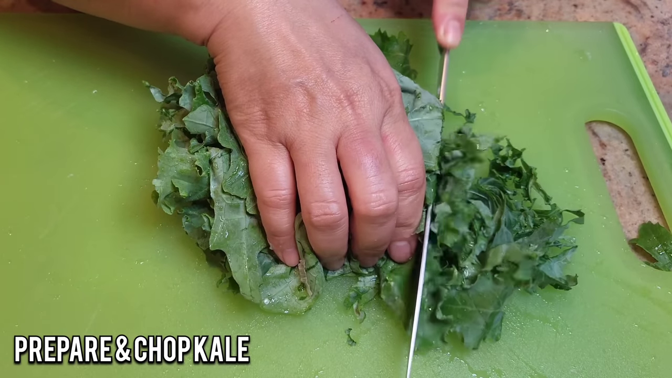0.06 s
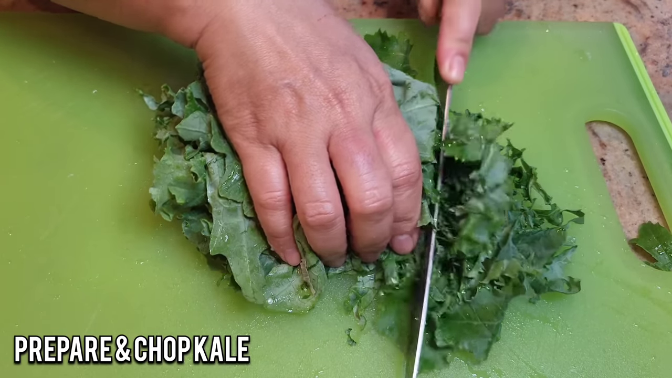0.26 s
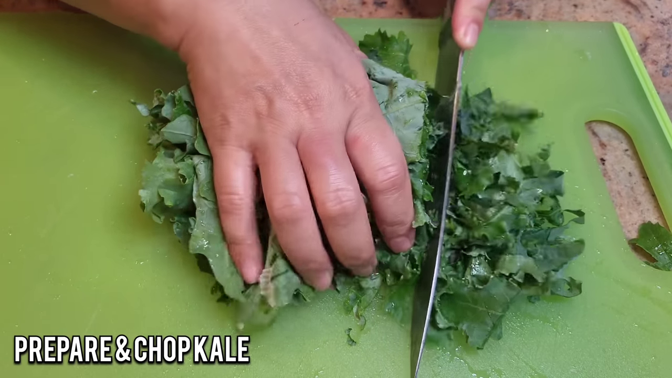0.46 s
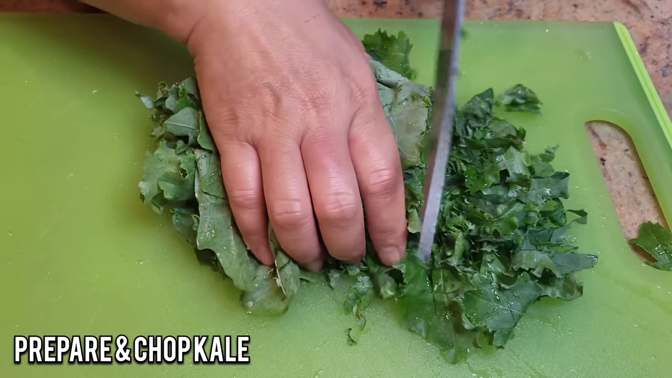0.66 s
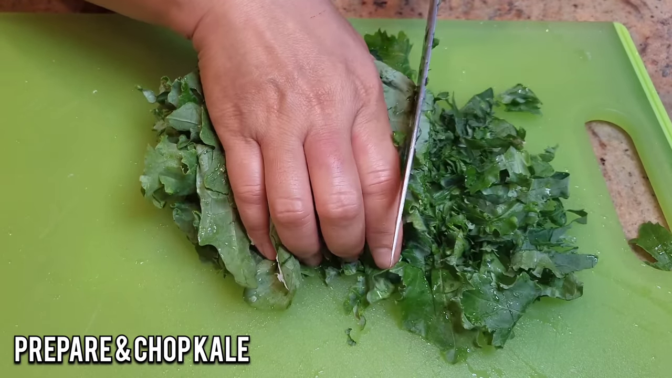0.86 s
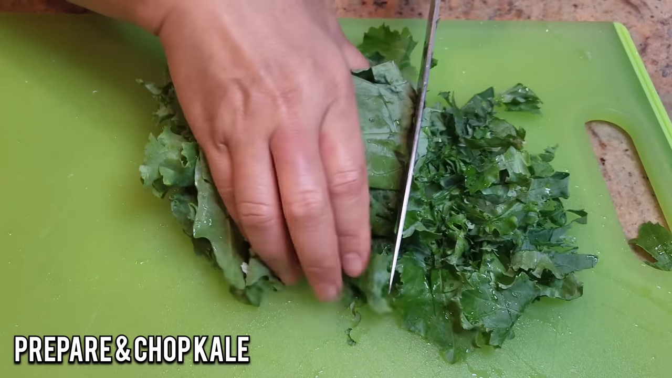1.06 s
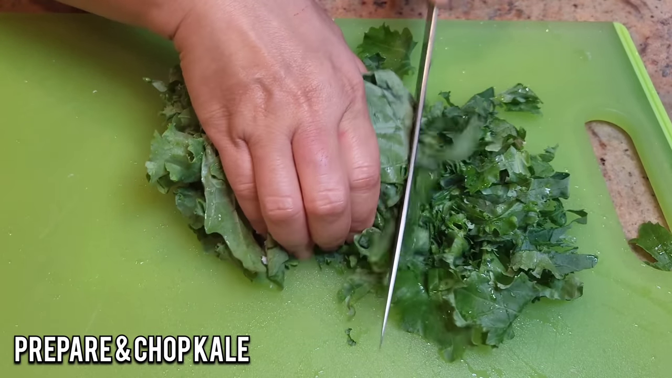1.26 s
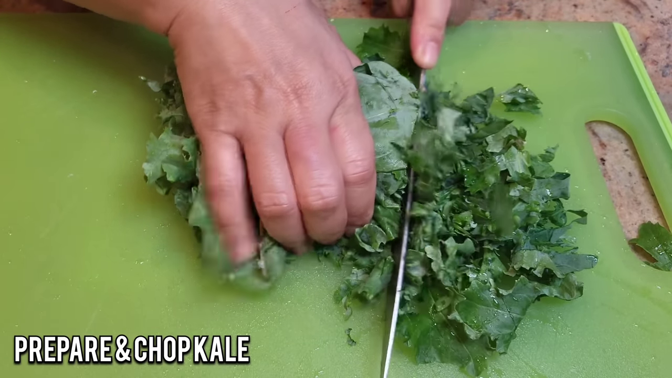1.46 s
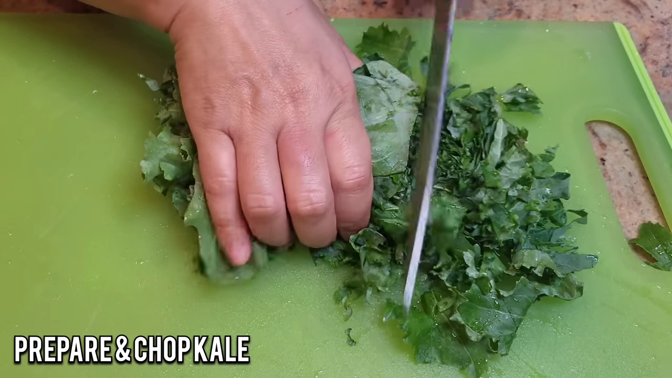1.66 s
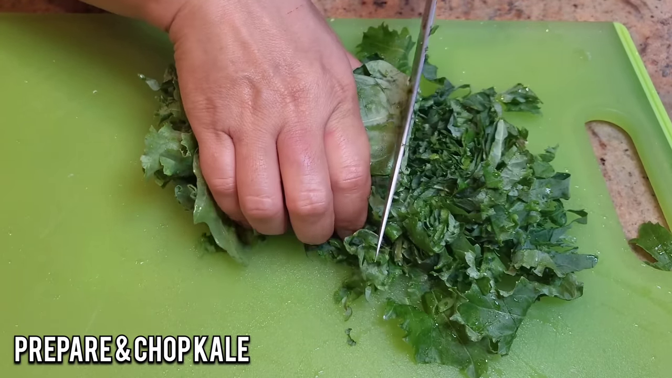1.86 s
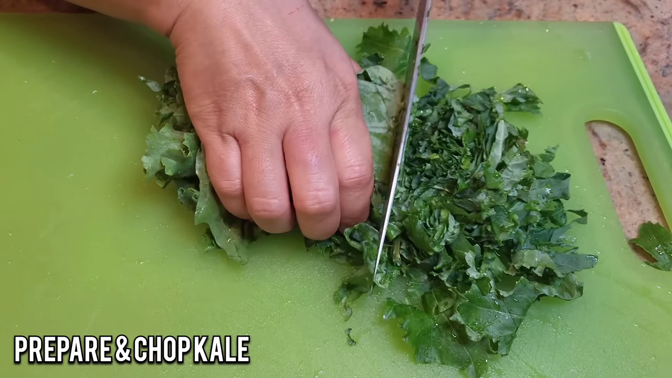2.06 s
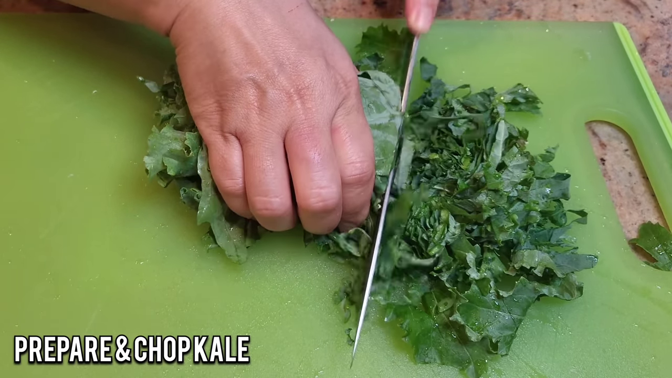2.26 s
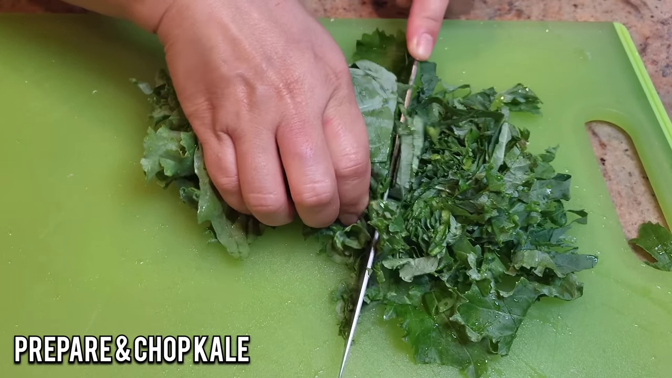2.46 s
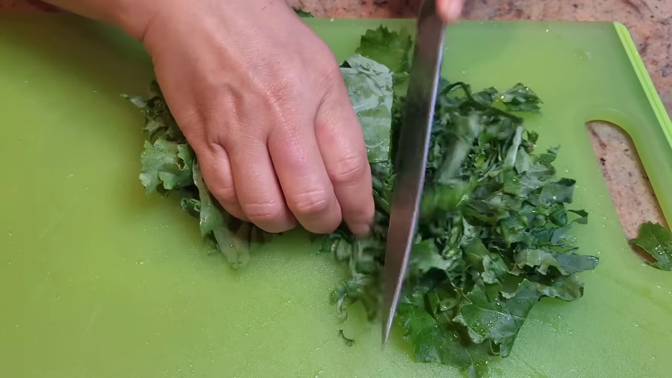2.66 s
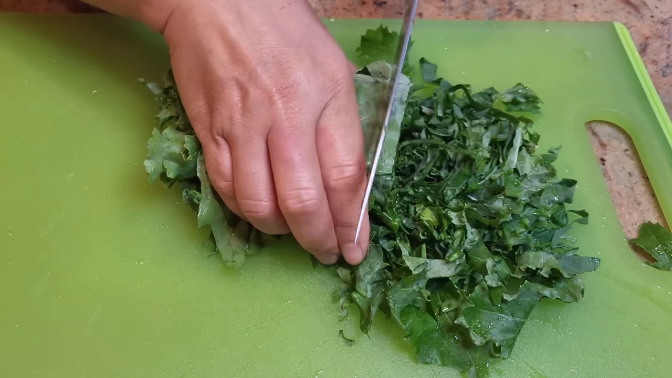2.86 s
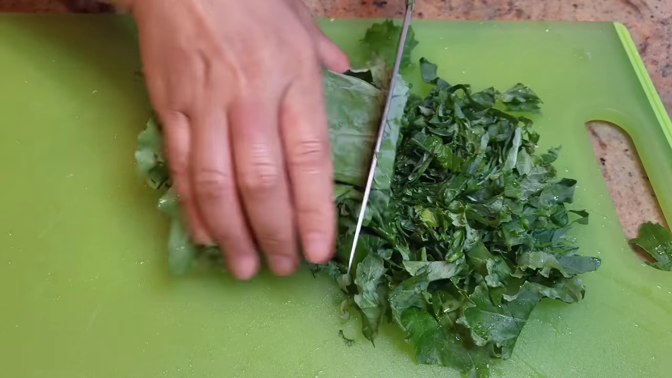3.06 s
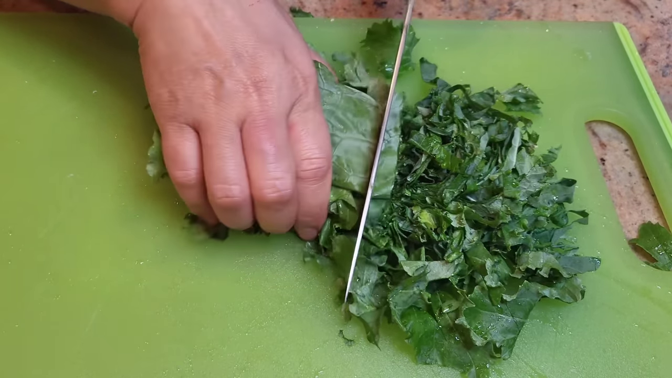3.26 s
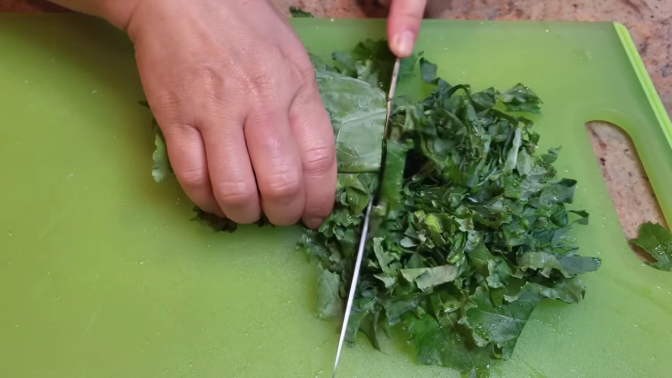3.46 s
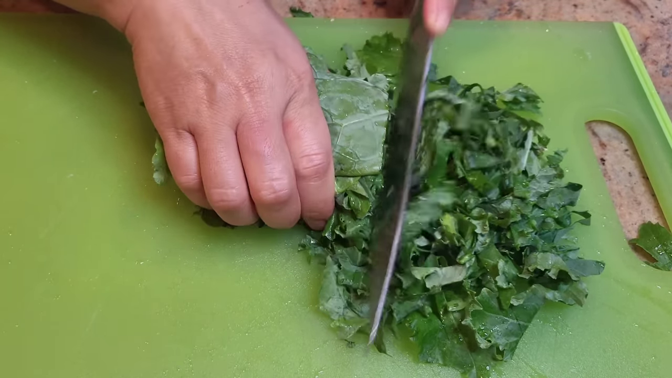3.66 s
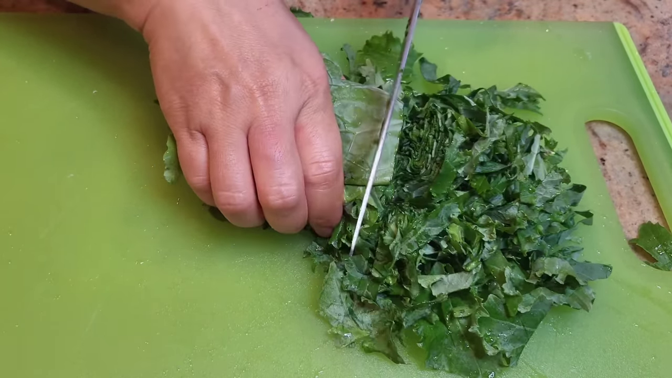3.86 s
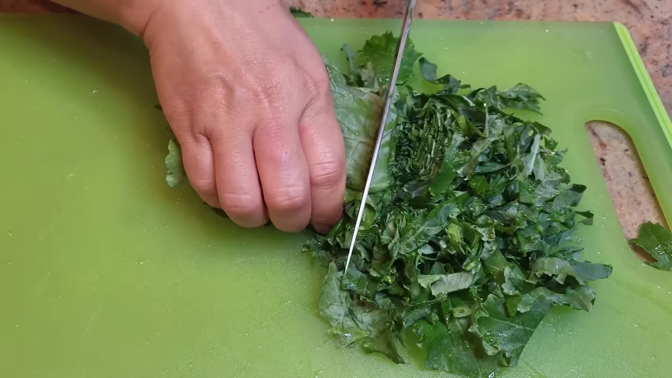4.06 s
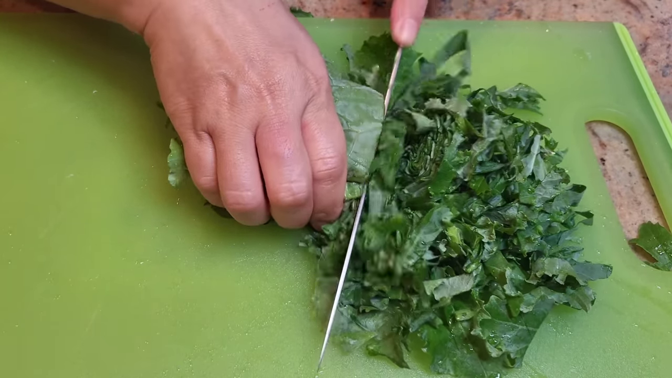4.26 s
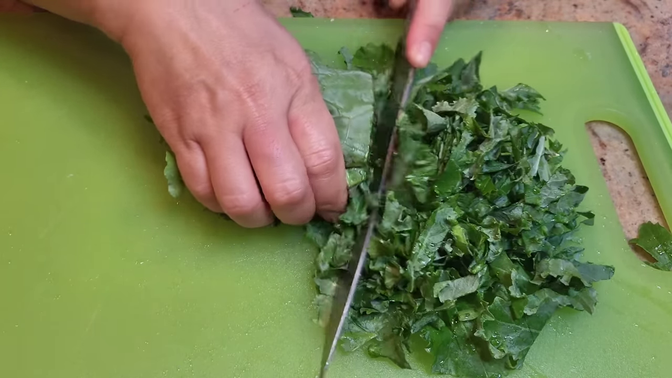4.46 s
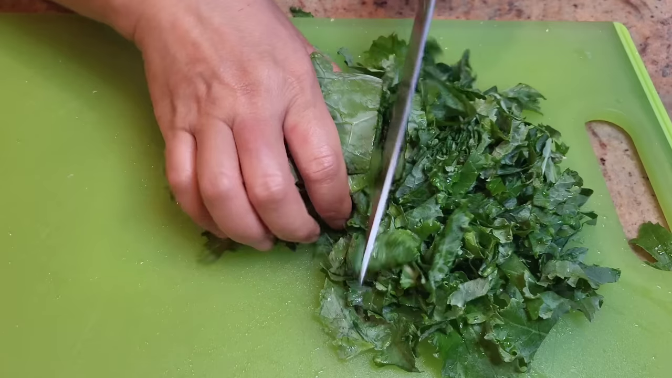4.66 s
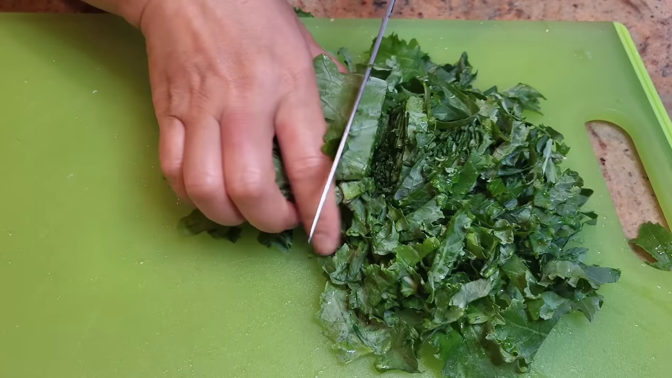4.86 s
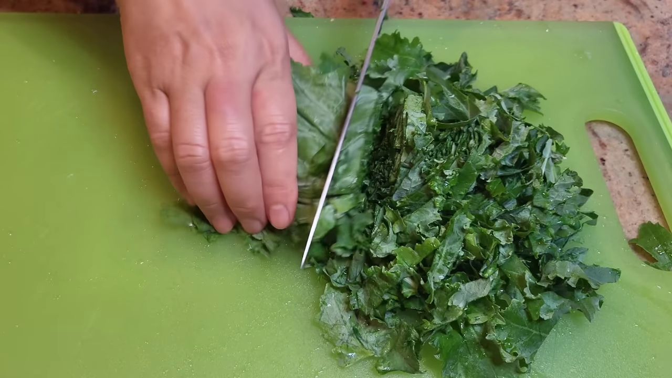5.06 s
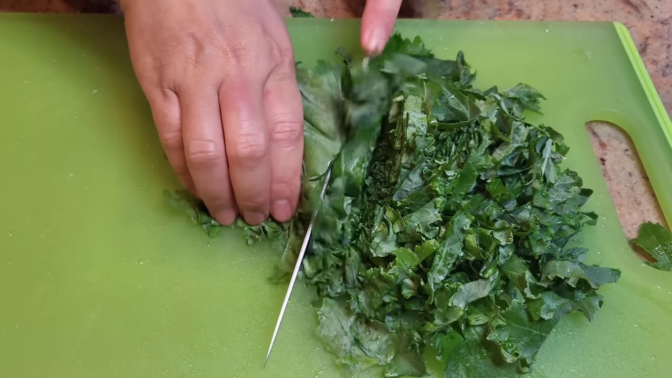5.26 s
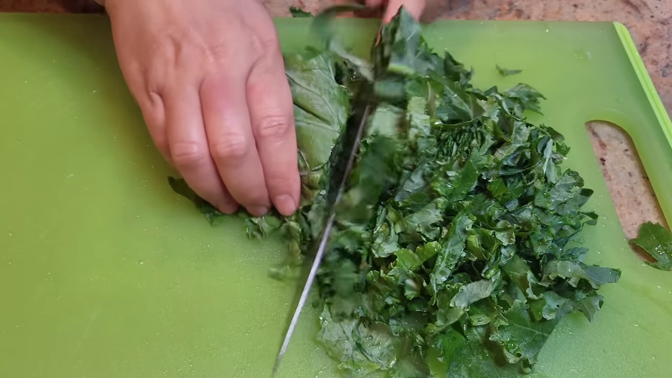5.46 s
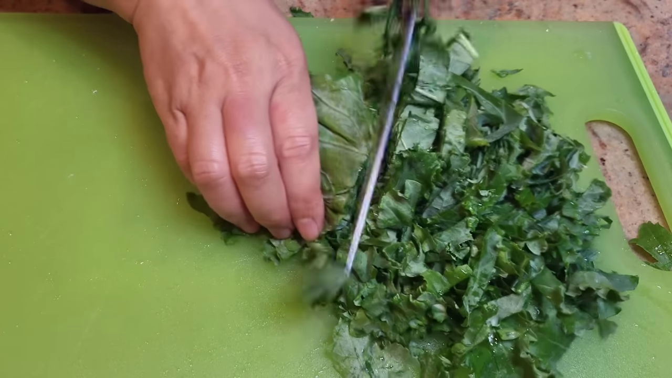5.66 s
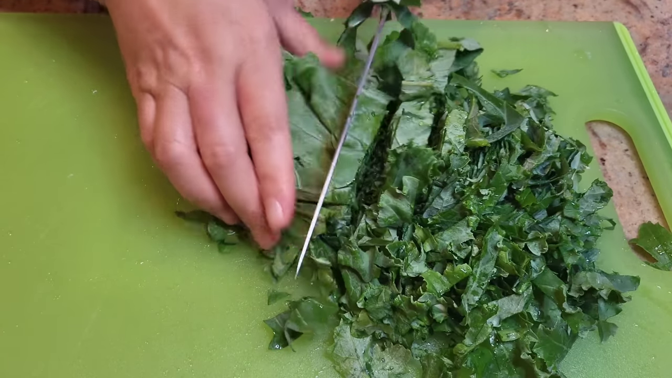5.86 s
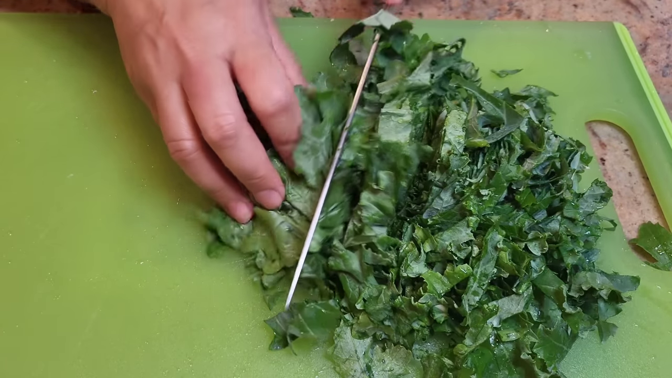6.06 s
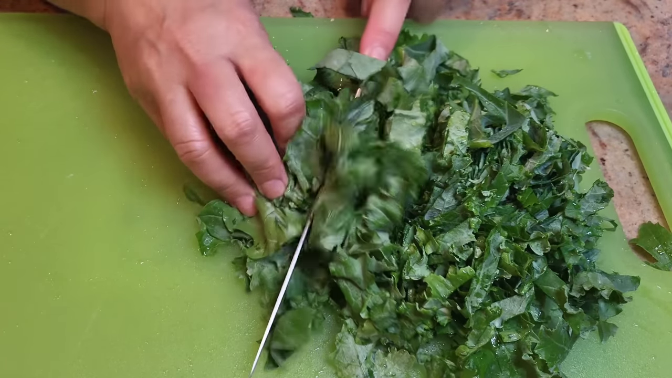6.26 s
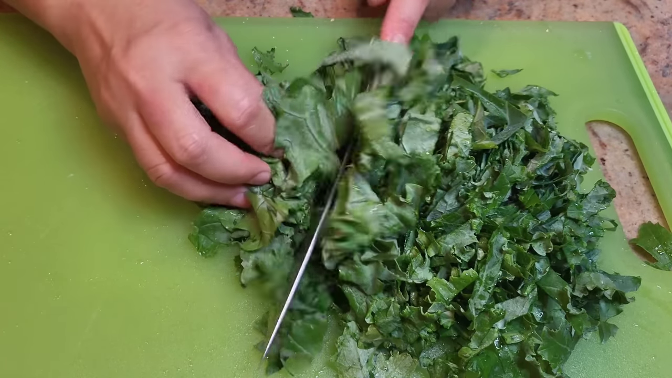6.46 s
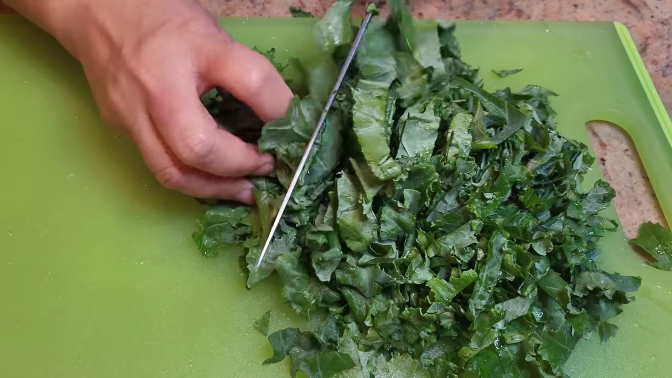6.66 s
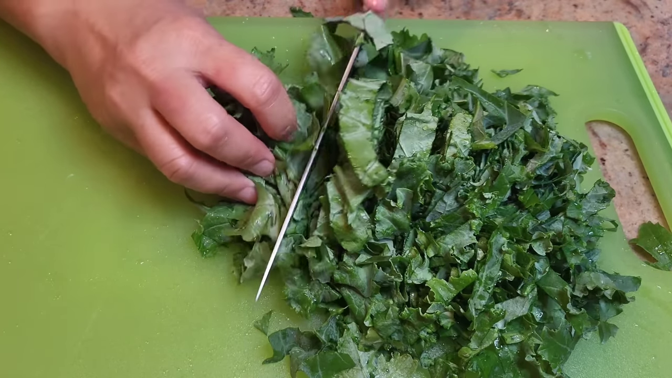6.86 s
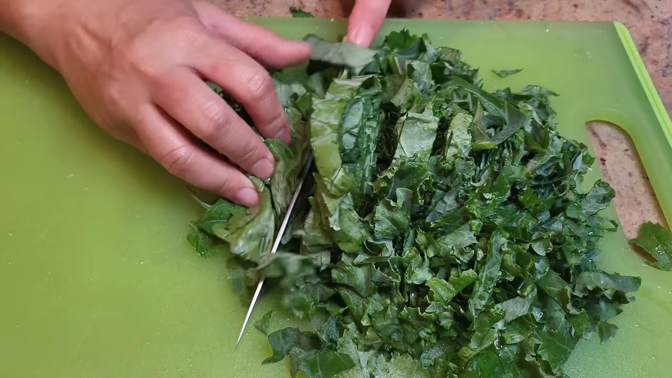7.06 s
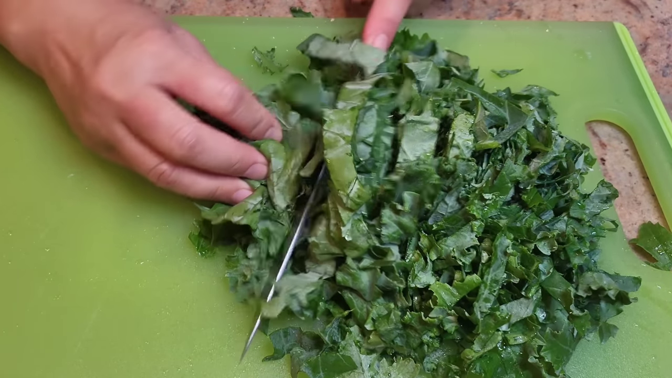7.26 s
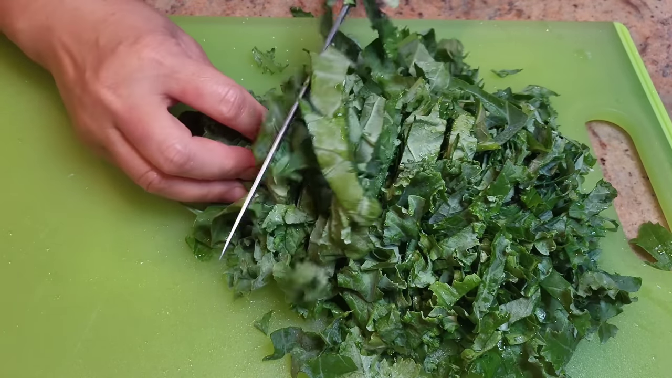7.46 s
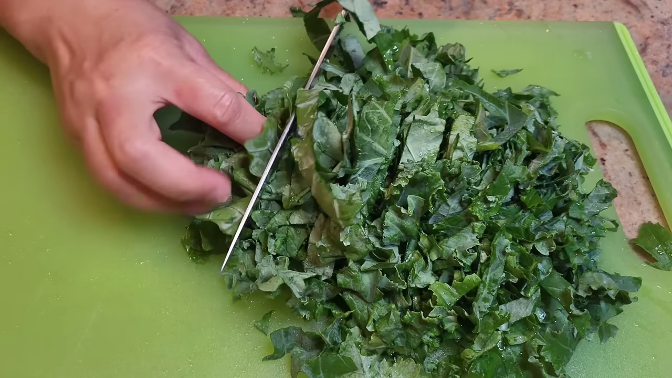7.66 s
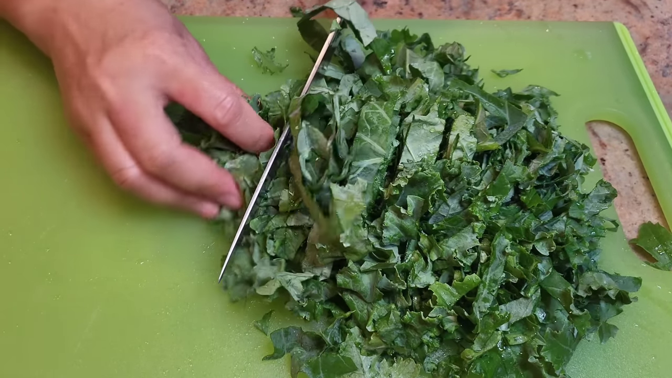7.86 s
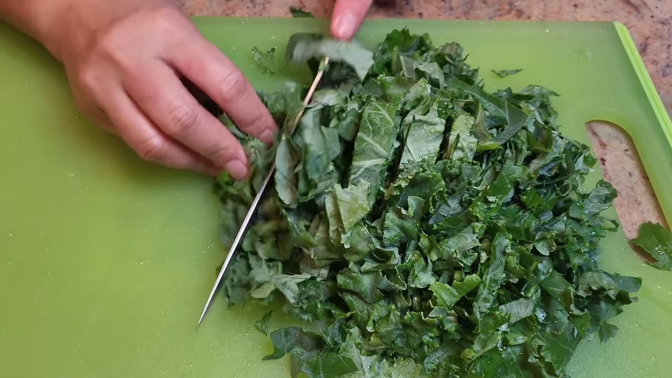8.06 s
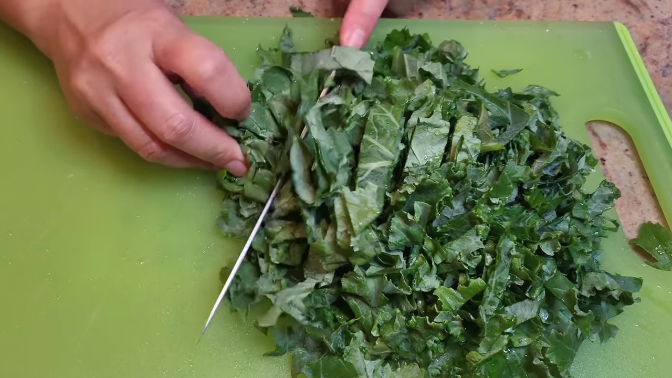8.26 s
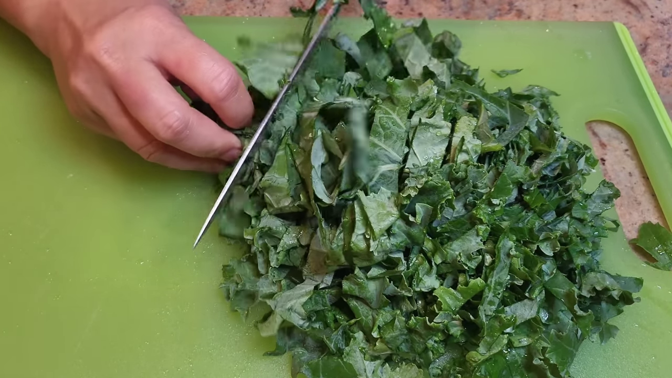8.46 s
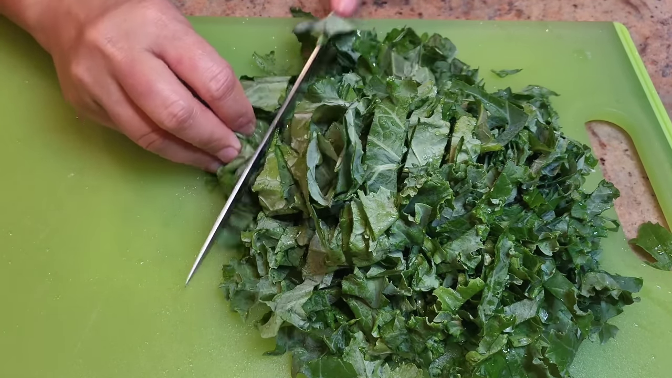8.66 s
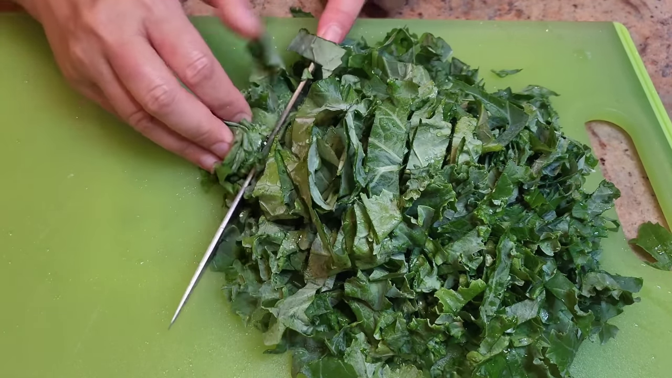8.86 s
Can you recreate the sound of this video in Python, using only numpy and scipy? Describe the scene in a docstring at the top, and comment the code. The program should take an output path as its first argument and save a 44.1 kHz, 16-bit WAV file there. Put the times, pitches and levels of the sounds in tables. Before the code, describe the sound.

A large knife cuts through a bunch of kale on a plastic board in ten steady strokes, about one a second. Each stroke is a crisp crunch, and most end with a short knock as the edge lands. Leaves rustle softly and ribs snap in between. The knocks grow louder in the second half, joined by a few brief blade scrapes. It sounds close, in a small kitchen with a faint appliance hum.

```python
"""Crisp crunches: a large knife slices ten times through a bunch of kale on a plastic board.
Each stroke squeezes the leaves, then cuts them in a swarm of tiny breaks that also shake the
board. Most strokes end with a knock as the edge lands. In between, single ribs snap and leaves
rustle. A small kitchen echoes it all, and an appliance hums faintly."""
import sys
import numpy as np
from scipy import signal
from scipy.fft import rfft, irfft, next_fast_len
from scipy.io import wavfile
from scipy.ndimage import uniform_filter1d

SR = 44100
rng = np.random.default_rng(int(sys.argv[2]) if len(sys.argv) > 2 else 0)


def file_out(sig):
    """Save sig as 16-bit WAV at sys.argv[1]."""
    # one column per channel
    cols = np.atleast_2d(sig).T
    # limit, then scale
    lim = np.clip(cols, -1, 1)
    pcm = np.round(lim * 32767).astype(np.int16)
    wavfile.write(sys.argv[1], SR, pcm)


N = 392914
TIME = np.arange(N) / SR

# The knife strokes: bite_s, squeeze_s (before the bite), cut_s, thickest_point (share of the cut),
# squeeze_db, crunch_db, swell_db (rise to the thickest point), grip_db, weight_db, crisp_db
STROKES = [(0.252, 0.26, 0.067, 0.61, -41, -32.5, 9, -35.5, -38.5, 1),
           (1.297, 0.087, 0.17, .8, -53, -29, 15.5, -32, -36.5, 3),
           (2.244, .1, .219, .45, -65, -34.5, 3, -36, -38.5, 4),
           (3.376, 0.079, 0.17, .65, -51, -31, 6, -32.5, -39.5, 1.5),
           (4.236, .03, .21, .42, -43, -32.5, 2.5, -34.5, -37, 2),
           (5.257, .095, 0.17, .6, -48.5, -29.5, 10, -32, -35.5, 2.5),
           (6.26, .09, 0.093, .88, -47, -27, 12, -30.5, -34.5, 0),
           (7.123, 0.053, .085, 0.91, -42.5, -30.5, 8, -30.5, -35, -2),
           (8.107, 0.077, .098, .85, -50.5, -31.5, 11, -35, -39, 2),
           (8.772, 0.087, 0.079, 0.58, -58.5, -32, 5, -33, -35, 2.5)]
# The tone of one tiny break in a leaf: frequency_hz, level_db
LEAF_TONE = [(100, -23), (400, -19.5), (900, -31), (1900, -0.5), (3200, -0.5), (5000, -0.5), (7400, -2),
             (10000, -4.5), (15800, -8)]


def from_db(db):
    """Turns decibels into a gain to multiply by."""
    return 10 ** (np.asarray(db) / 20)


def unit(x):
    """Scales a signal to an average power of one."""
    return x / np.sqrt(np.mean(x ** 2) + 1e-20)


def lookup(points, hz):
    """Reads between the rows of a (frequency_hz, value) table, spaced by octaves."""
    row_hz, value = np.transpose(points)
    return np.interp(np.log(hz + 1), np.log(row_hz + 1), value)


def add(mix, start_s, sound):
    """Lays a sound into the mix at its start time."""
    part = mix[max(round(start_s * SR), 0):][:len(sound)]
    part += sound[:len(part)]


def click(tone, size=2048):
    """The shortest click that has this tone, with an energy of one."""
    log_gain = np.log(from_db(lookup(tone, abs(np.fft.fftfreq(size, 1 / SR)))))
    spectrum = np.exp(signal.hilbert(log_gain).conj())  # packs the energy at the start
    pulse = np.fft.ifft(spectrum).real[:size // 2]
    return pulse / np.linalg.norm(pulse)


def play_at(clicks, sound):
    """Plays a copy of the sound at every click."""
    return signal.oaconvolve(clicks, sound)[:N]


def random_clicks(per_s, spread_db):
    """Clicks of uneven size whose average power stays the same even if their rate changes."""
    at = np.flatnonzero(rng.random(N) < per_s / SR)
    size_db = spread_db * np.minimum(rng.exponential(1, len(at)), 3.5)
    clicks = np.zeros(N)
    clicks[at] = rng.choice([-1, 1], len(at)) * from_db(size_db)
    return unit(clicks / np.sqrt(per_s))


def spurts(depth_db, length_s):
    """An uneven gain: the edge meets one leaf after another."""
    wander = np.interp(TIME / length_s, np.arange(8000), rng.standard_normal(8000))
    return unit(from_db(depth_db * wander))


def spread_treble(spectra, hz, corner_hz):
    """Long, low waves arrive alike on the left and right; short, high ones differ."""
    angle = np.pi / 4 * (.15 + .85 * hz ** 2 / (hz ** 2 + corner_hz ** 2))
    return np.cos(angle) * spectra[0] + np.array([[1], [-1]]) * np.sin(angle) * spectra[1]


def kitchen(x, early_db, tail_db, lean_db=0, lag_s=0, smooth_bins=160):
    """Sound arrives directly, off a cupboard, off the counter and as the room's fading tail."""
    # How long the room takes to fade by 60 dB: frequency_hz, fade_s
    fade_times = [(100, 0.75), (300, 0.38), (1000, 0.35), (3000, 0.37), (8000, 0.31), (15000, 0.35)]
    # Where the board's sound seems to sit: frequency_hz, left_minus_right_db
    balance = [(250, -1), (600, -0.6), (1050, 2.5), (2000, 1.6), (4000, 0.5), (8000, 0.7), (13000, -3)]
    size, echo_s, echo_gain = 32768, 0.0067, 0.15
    t, hz = np.arange(size) / SR, np.fft.rfftfreq(size, 1 / SR)
    early, tail = rng.standard_normal((2, 2, size))
    early = early * np.exp(-t / 0.0057) * (t > .001)  # quick scatter from the counter
    band_hz, frame_s, bands = signal.stft(tail, SR, nperseg=256)
    fade = np.exp(-np.log(1000) * frame_s / lookup(fade_times, band_hz)[:, None])
    tail = signal.istft(bands * fade, SR, nperseg=256)[1][:, :size]
    tail = tail * (1 - np.exp(-(t / 0.0013) ** 2))  # soft start
    scatter = rfft(from_db(early_db) * unit(early) + from_db(tail_db) * unit(tail)) / np.sqrt(size)
    cupboard = echo_gain * np.exp(-2j * np.pi * hz * echo_s)
    path = 1 + cupboard + spread_treble(scatter, hz, corner_hz=287)
    # The room spreads each band's energy over time without adding to it.
    path /= np.sqrt(uniform_filter1d(abs(path) ** 2, size=smooth_bins, axis=1))
    path *= from_db(np.array([[1], [-1]]) * (lookup(balance, hz) + lean_db) / 2)  # plus leans left
    path *= np.exp(-2j * np.pi * hz * np.maximum([[-lag_s], [lag_s]], 0))  # the far side is later
    return signal.oaconvolve(np.atleast_2d(x), irfft(path)[:, :size * 3 // 4], axes=1)[:, :N]


def appliance(air_db=-65.5, waver_radians=0.52, waver_hz=1.1):
    """A motor hums with faint, wavering tones in a soft rush of air."""
    # The motor's tones: pitch_hz, level_db
    hum_tones = [(57, -78), (121, -85.5), (181, -80), (241, -79), (324, -89), (365, -74.5), (434, -78.5),
                 (485, -74.5), (646, -85.5), (808, -77.5), (974, -94)]
    # The tone of the air: frequency_hz, level_db
    air_tone = [(12, -59), (20, -28), (50, -8.5), (90, -15), (130, -3), (210, -4.5), (380, -6.5), (530, -7),
                (900, -13.5), (1600, -30.5), (4000, -21.5), (15800, -26.5)]
    size = next_fast_len(N)
    bin_hz = np.fft.rfftfreq(size, 1 / SR)
    noise = spread_treble(rfft(rng.standard_normal((2, size))), bin_hz, corner_hz=351)
    air = irfft(noise * from_db(lookup(air_tone, bin_hz)), size)[:, :N]
    hum = np.zeros((2, N))
    for hz, db in hum_tones:
        drift = np.interp(TIME * waver_hz, np.arange(200), rng.standard_normal(200))
        phase = 2 * np.pi * (hz * TIME + rng.random()) + waver_radians * drift
        arrival_s = rng.uniform(-.0004, .0004, (2, 1))
        hum += from_db(db) * np.sqrt(2) * np.sin(phase + 2 * np.pi * hz * arrival_s)
    return hum + from_db(air_db) * unit(air)


def board_bumps(pitch_hz=57, swell_s=0.023):
    """The whole board rocks on the counter for a few slow cycles."""
    # The hand sets the board down softly: start_s, level_db
    bumps = [(1.53, -55), (4.57, -62), (5.585, -59), (6.64, -68)]
    t, out = np.arange(SR // 4) / SR, np.zeros(N)
    swell = t / swell_s * np.exp(1 - t / swell_s)
    for start_s, db in bumps:
        add(out, start_s, from_db(db) * swell * np.sin(2 * np.pi * pitch_hz * t))
    return out


def blade_scrapes(width_hz=420):
    """The blade slides sideways; its tiny slips ring in one broad band of pitch."""
    # The flat of the blade drags over leaves and plastic: middle_s, half_length_s, level_db, pitch_hz
    scrapes = [(0.499, 0.039, -47.5, 1680), (1.878, .04, -81, 1690), (3.207, 0.023, -63, 2079),
               (6.335, 0.029, -33.5, 2181), (7.166, 0.043, -39, 2528), (8.815, 0.029, -38, 2145)]
    t, out = np.arange(SR // 30) / SR, np.zeros(N)
    for middle_s, half_s, db, hz in scrapes:
        slips = rng.standard_normal(SR // 3)
        ring = np.exp(-np.pi * width_hz * t) * np.sin(2 * np.pi * hz * t)
        offset_s = (np.arange(len(slips)) - len(slips) / 2) / SR
        swell = from_db(db) * np.exp(-(offset_s / half_s) ** 2)
        add(out, middle_s + offset_s[0], swell * unit(signal.fftconvolve(slips, ring, "same")))
    return kitchen(out, early_db=-3, tail_db=-4)


def board_ring(pitch_factor, length_factor, hardness, cushion_s=0.00078):
    """The board rings after a blow softened by leaves; hardness lifts high tones, in dB per octave."""
    # The natural tones of the board and blade: pitch_hz, level_db, fade_s (to fall 60 dB)
    tones = [(590, -6.5, 0.11), (749, -7.5, 0.12), (826, -13.5, 0.065), (936, 7.5, 0.035), (1030, -.5, .21),
             (1060, 1, .022), (1105, -10, .16), (1200, -9, .14), (1386, -13, 0.14), (1430, -9.5, 0.057),
             (1815, -4.5, 0.033), (1940, -15, 0.031), (2050, -21, 0.11), (2410, -22, 0.024),
             (3017, -16.5, 0.058), (3600, -19, 0.011)]
    t, ring = np.arange(SR // 5) / SR, np.zeros(SR // 5)
    main_hz = max(tones, key=lambda tone: tone[1])[0]
    for hz, db, fade_s in tones:
        gain = from_db(db + hardness * max(np.log2(hz / main_hz), 0))
        fade = np.exp(-np.log(1000) * t / (fade_s * length_factor))
        ring += gain * fade * np.sin(2 * np.pi * hz * pitch_factor * (t - cushion_s))
    ring *= 1 - np.exp(-(t / cushion_s) ** 2)
    ring = signal.sosfilt(signal.butter(2, 450, "high", fs=SR, output="sos"), ring)
    return ring / abs(ring).max()


def board_shake(grip, weight, rub_db=0.5, ring_db=-10, detune=0.072):
    """The jerking blade drums on the board and makes it ring, lower at the heel than at the tip."""
    # The dull thud of the board on the counter: frequency_hz, level_db
    thud_tone = [(15, -43.5), (32, -18.5), (55, -7.5), (78, -12), (115, -0.5), (155, -3), (195, 3),
                 (250, -5.5), (310, -12), (420, -15.5), (800, -35), (4000, -58.5)]
    # The blade's rubbing, passed on to the board: frequency_hz, level_db
    rub_tone = [(60, -35), (200, -14.5), (380, -6.5), (540, -4), (680, -2), (880, -2.5), (1100, -5),
                (1400, -2.5), (2200, -9), (4000, -18.5), (12000, -58)]
    shoves = weight * random_clicks(per_s=700, spread_db=-2.5)
    thuds = play_at(shoves, click(thud_tone))
    out = kitchen(thuds, early_db=-3.5, tail_db=-13.5, lean_db=1, smooth_bins=40)
    force = grip * spurts(depth_db=4.25, length_s=0.0043)
    for place in (-1, 1):  # heel, tip
        ring = board_ring(pitch_factor=1 + place * detune, length_factor=.25, hardness=-1)
        jerks = force * random_clicks(per_s=1100, spread_db=2)
        rubbing = from_db(rub_db) * play_at(jerks, click(rub_tone))
        ringing = from_db(ring_db) * play_at(jerks, ring / np.linalg.norm(ring))
        out += kitchen(rubbing + ringing, early_db=5, tail_db=-4, lag_s=place * 0.00006)
    return out


def edge_knocks():
    """The edge breaks through the last leaf and lands on the plastic; thick leaves shorten the ring."""
    # The landings: start_s, level_db, pitch_factor, length_factor, hardness_db_per_octave,
    # left_minus_right_db
    knocks = [(0.088, -30.5, 0.94, 0.33, -11, -2), (0.147, -33.5, 0.78, .2, -1, 4),
              (0.318, -29, 0.97, 0.48, 2, 4), (1.097, -37.5, 1.04, 0.18, 2, -2),
              (1.467, -20, 0.74, 0.16, 5, 2), (2.212, -26.5, 0.87, 0.23, -21, 3),
              (3.555, -15.5, 1.065, 0.39, 1, 6), (4.471, -20.5, 1.046, 0.45, 12, 4),
              (5.414, -12, 0.96, 0.48, 3, -1), (6.351, -4, 1.03, 0.41, 10.5, 2.5),
              (7.2072, -6, 1.0, 1.0, 4.5, 4.5), (7.362, -25.5, 1.04, 0.32, 9, -2.5),
              (8.202, -15.5, 1.01, 0.74, -16.5, 1.5), (8.35, -59, 1.03, 0.63, 9, 3),
              (8.832, -22, 0.71, 0.51, 6, 2), (8.850, -9.5, .99, 0.63, 10.5, 3)]
    out = np.zeros((2, N))
    for start_s, db, pitch_factor, length_factor, hardness, lean_db in knocks:
        ring = board_ring(pitch_factor, length_factor, hardness)
        for channel, side in zip(out, (1, -1)):
            add(channel, start_s, from_db(db + side * lean_db / 2) * ring)
    return kitchen(out, early_db=-12, tail_db=-10, lag_s=.0001)


def rib_snaps(fade_s=0.0006, rise_s=0.00055):
    """A rib gives way in a quick run of tearing fibres and ticks the board."""
    # Single ribs and leaf edges breaking: start_s, energy_db, board_db (compared with the snap)
    snaps = [(0.056, -8, -18), (0.147, -14, 0), (0.203, -20, 5), (0.255, -16, -12), (0.770, -40.5, -7),
             (1.097, -17, -7), (1.213, -42, -12.5), (1.294, -20.5, 7.5), (1.329, -15, 6), (1.848, -28, -27),
             (2.213, -9.5, -5), (2.280, -23, 3), (2.612, -18, -10), (3.334, -22, -5), (3.375, -8.5, 0.5),
             (3.395, -12, -4), (4.131, -19, -7), (4.193, -14, -7), (4.279, -9, -3), (5.086, -19.5, -13.5),
             (5.144, -15, -20), (5.176, -20, -4), (5.201, -19, -22), (5.252, -10.5, -2), (5.283, -27, -10),
             (5.865, -35, -2), (6.164, -19, -26), (6.26, -8.5, -27), (6.277, -15.5, -19.5),
             (6.832, -30.5, -8), (7.11, -19.5, -6), (7.651, -39, -6), (7.967, -25, -27),
             (8.027, -19.5, -20.5), (8.603, -29.5, -32), (8.683, -26, -22)]
    t, out = np.arange(SR // 100) / SR, np.zeros(N)
    leaf = click(LEAF_TONE)
    ring = board_ring(pitch_factor=0.9, length_factor=0.11, hardness=13)
    for start_s, db, board_db in snaps:
        tear = rng.standard_normal(len(t)) * np.exp(-t / fade_s) * (1 - np.exp(-(t / rise_s) ** 2))
        add(out, start_s, from_db(db) * np.convolve(tear / np.linalg.norm(tear), leaf))
        add(out, start_s, from_db(db + board_db) * ring / np.linalg.norm(ring))
    return kitchen(out, early_db=-0.5, tail_db=0.5, lean_db=-0.5)


def hand_effort():
    """Three gains over time: the leaves' crunch, the blade's grip on the board, the hand's weight."""
    # Fingers and blade shift loose leaves: middle_s, half_length_s, level_db, board_db (relative)
    rustles = [(.485, 0.032, -47.5, -6.5), (.545, 0.052, -54, -3), (.91, 0.017, -76, 3.5),
               (1.07, .032, -54, -9), (1.133, 0.035, -58, -3), (1.77, 0.079, -68, -5.5),
               (1.867, 0.059, -62, -6), (2.581, 0.049, -62.5, -9), (2.755, 0.055, -61.5, -8.5),
               (2.902, 0.047, -70.5, -4.5), (3.01, 0.026, -70, -5), (3.13, 0.068, -66, -4),
               (3.202, .035, -56, -8), (3.28, 0.026, -63, 0.5), (3.73, 0.044, -67, -11),
               (3.889, .025, -75, 3), (4.061, 0.034, -69, -3), (4.571, 0.069, -60, -5.5),
               (4.75, 0.047, -62.5, -6), (5.0, 0.06, -68, -3), (5.075, 0.029, -56, -10),
               (5.11, 0.026, -58.5, -4), (5.698, 0.11, -61, -4.5), (5.93, 0.05, -65, -4),
               (6.02, .05, -63, -8), (6.13, 0.051, -64, -13.5), (6.551, 0.044, -62, -3),
               (6.656, .025, -61, -1), (6.717, 0.032, -65, -8), (6.855, 0.048, -57, -14),
               (6.93, 0.05, -56, -14), (7.02, 0.032, -62, -7), (7.353, 0.078, -57.5, 1),
               (7.679, 0.037, -65.5, -7), (7.783, 0.057, -70, -12), (7.98, 0.035, -55, -16),
               (8.385, 0.1, -61.5, -8.5), (8.634, 0.032, -61, -29)]
    touch_db_per_s, attack_db_per_s, release_db_per_s, settle_db_per_s = 601, 557.5, 330, 50
    power = np.zeros((3, N))
    power[0] = from_db(-82) ** 2  # the held bunch is never quite still
    cushioned = from_db([[0], [-8], [-16]])  # uncut leaves shield the board
    for bite_s, squeeze_s, cut_s, thickest, *levels in STROKES:
        squeeze_db, crunch_db, swell_db, grip_db, weight_db, _ = levels
        t = TIME - bite_s
        depth = np.clip(t / cut_s, 0, 1)
        before_s, after_s = np.clip(-t, 0, 1), np.clip(t - cut_s, 0, 1)
        touch_db = touch_db_per_s * np.maximum(before_s - squeeze_s, 0)
        slack_db = .5 * np.minimum(before_s / squeeze_s, 1)  # the squeeze tightens up to the bite
        squeeze = (t < 0) * from_db(squeeze_db - touch_db - slack_db)
        arch_db = swell_db * (1 - depth / thickest) ** 2
        cut = from_db(-attack_db_per_s * before_s - arch_db - release_db_per_s * after_s)
        settle = (t > cut_s) * from_db(crunch_db - 27 - settle_db_per_s * after_s)  # cut strips sag
        power += ((squeeze + settle) * cushioned) ** 2
        power[0] += (cut * from_db(crunch_db)) ** 2
        # The board takes more of the force as the cut deepens.
        power[1] += (cut * from_db(grip_db - 4.5 * (1 - depth))) ** 2
        power[2] += (cut * from_db(weight_db - 7.5 * (1 - depth))) ** 2
    for middle_s, half_s, db, board_db in rustles:
        near = abs(TIME - middle_s) < 2 * half_s
        swell = from_db(db) * np.exp(-((TIME[near] - middle_s) / half_s) ** 2)
        power[:, near] += (swell * from_db([[0], [board_db], [-9]])) ** 2
    return np.sqrt(power)


def crispness(x, above_hz=8340, fall_db=5):
    """The highest treble drops during each cut, as the blade sinks from thin leaf into fleshy rib."""
    bite_s, _, cut_s, *_, crisp_db = np.transpose(STROKES)
    times_s = np.column_stack([bite_s, bite_s + cut_s]).ravel()
    levels_db = np.column_stack([crisp_db, crisp_db - fall_db]).ravel()
    gain = from_db(np.interp(TIME, times_s, levels_db))
    treble = signal.sosfiltfilt(signal.butter(2, above_hz, "high", fs=SR, output="sos"), x)
    return x + (gain - 1) * treble


def leaf_crunch(effort, level_db=-6, full_cut_db=-33):
    """Cells burst at four places along the edge: a few crackles in a rustle, a swarm in a full cut."""
    cutting = effort / from_db(full_cut_db)
    bursts_per_s = 55 + 2800 * cutting
    loose = np.exp(-10 * cutting)  # loose leaves shift in longer, more uneven spurts
    gain = effort * spurts(depth_db=1.83, length_s=0.0044)
    gain *= spurts(depth_db=3, length_s=0.028) ** loose
    out = np.zeros((2, N))
    for place in np.linspace(-1, 1, 4):
        bursts = play_at(gain * random_clicks(bursts_per_s, spread_db=3), click(LEAF_TONE))
        out += kitchen(bursts, early_db=5, tail_db=-6, lean_db=place * 12.2, lag_s=place * 0.0002)
    return from_db(level_db) * out


def scene():
    """Adds up the kale, the board, the blade and the hum."""
    leaves, grip, weight = hand_effort()
    kale = crispness(leaf_crunch(leaves) + rib_snaps())
    return kale + board_shake(grip, weight) + edge_knocks() + blade_scrapes() + board_bumps() + appliance()


def record(dry, cutoff_hz=15980):
    """Removes the very highest treble."""
    low_pass = signal.firwin(511, cutoff_hz, window=("kaiser", 9), fs=SR)
    return signal.oaconvolve(dry, low_pass[None], "same")


dry = scene()
out = record(dry)
file_out(out)
```